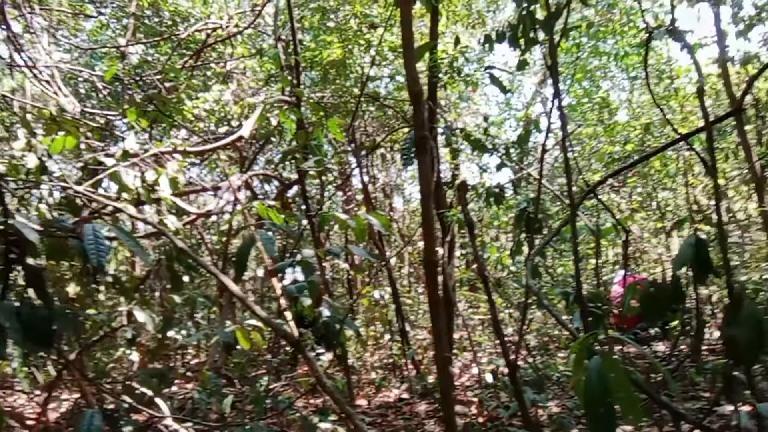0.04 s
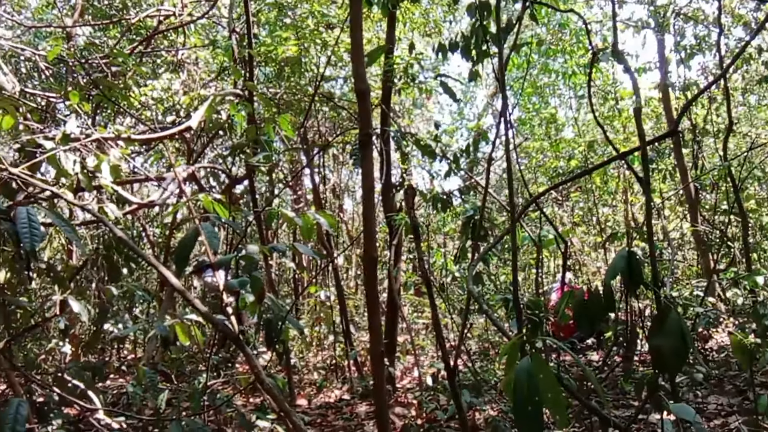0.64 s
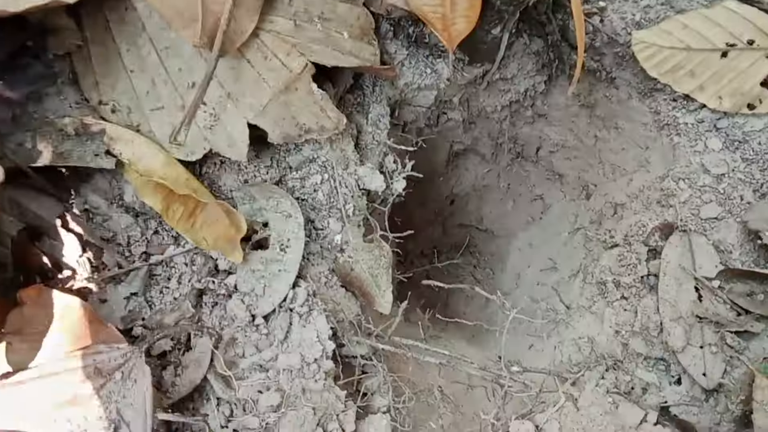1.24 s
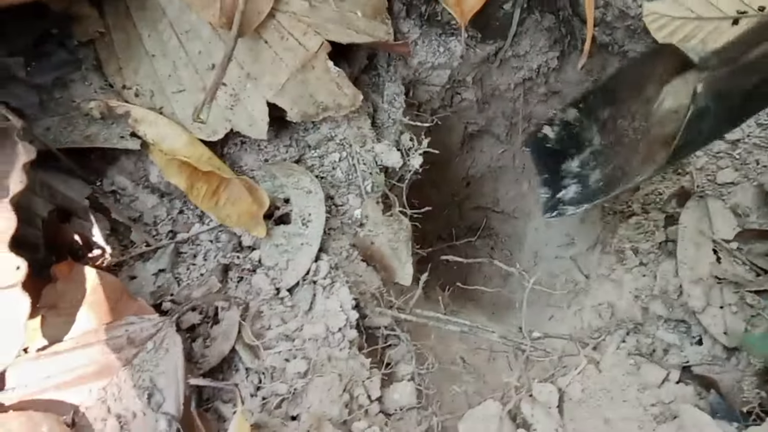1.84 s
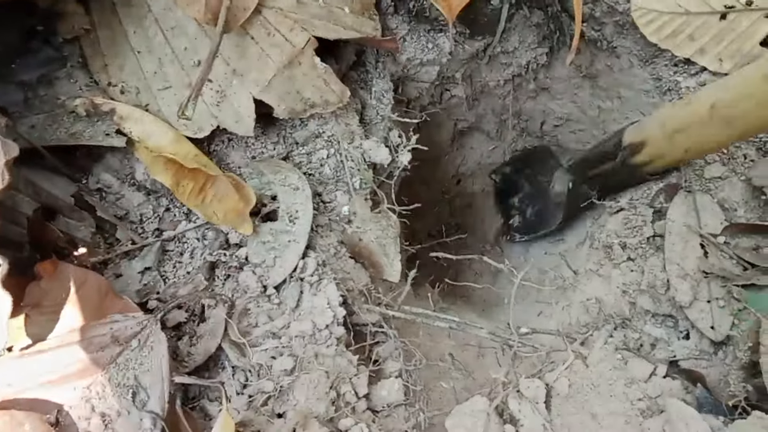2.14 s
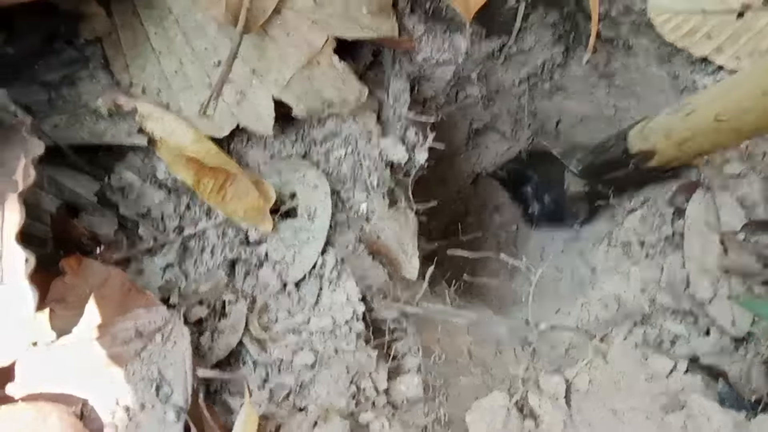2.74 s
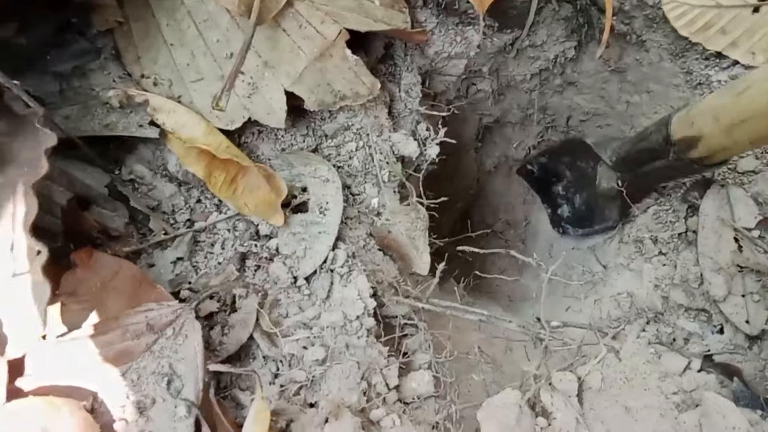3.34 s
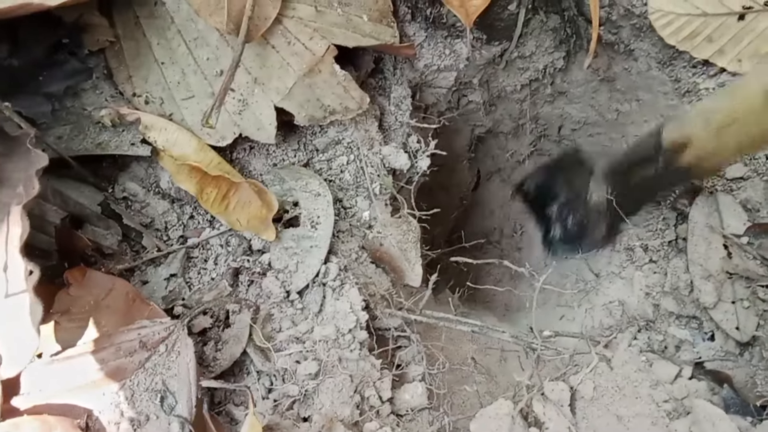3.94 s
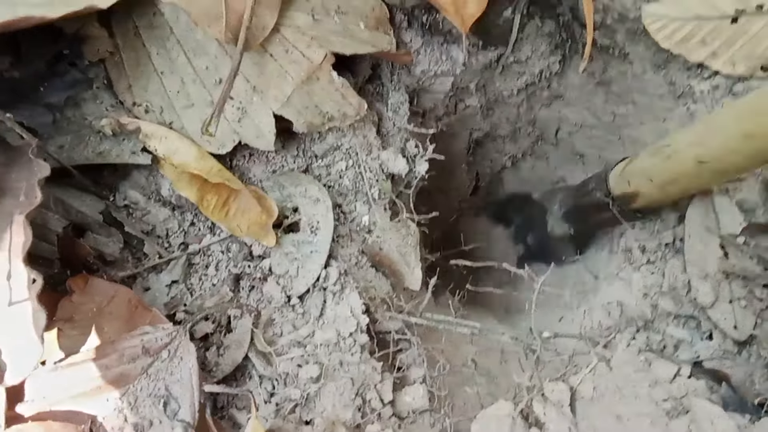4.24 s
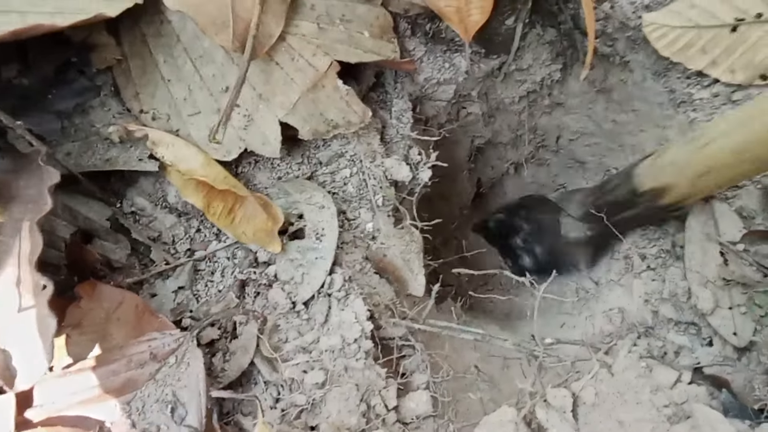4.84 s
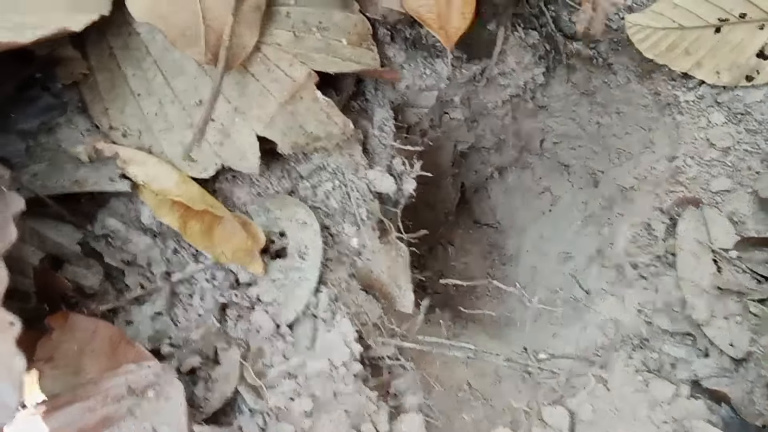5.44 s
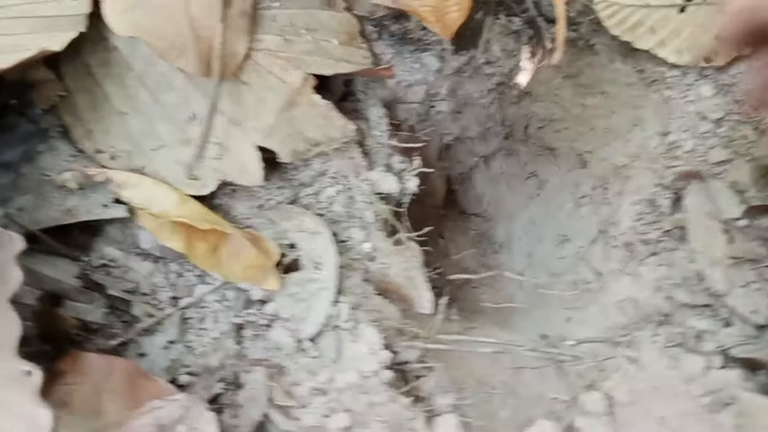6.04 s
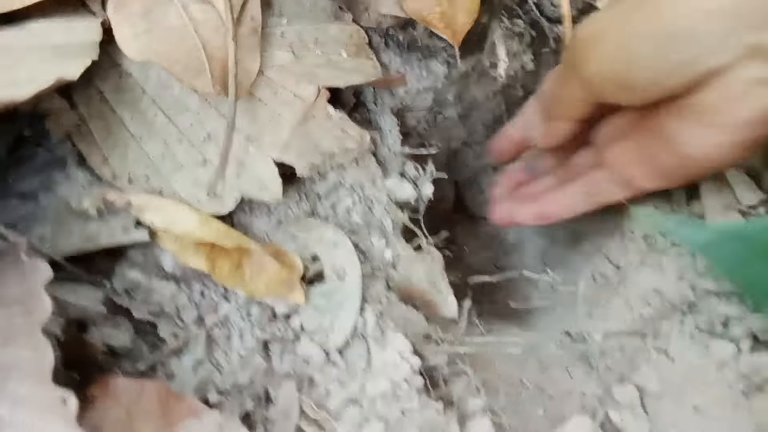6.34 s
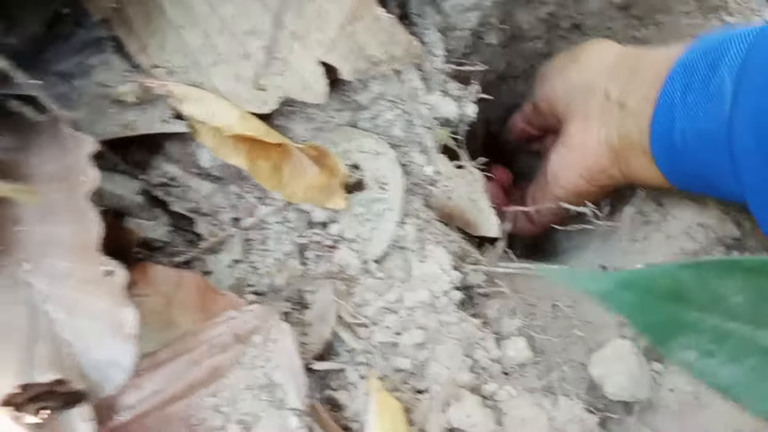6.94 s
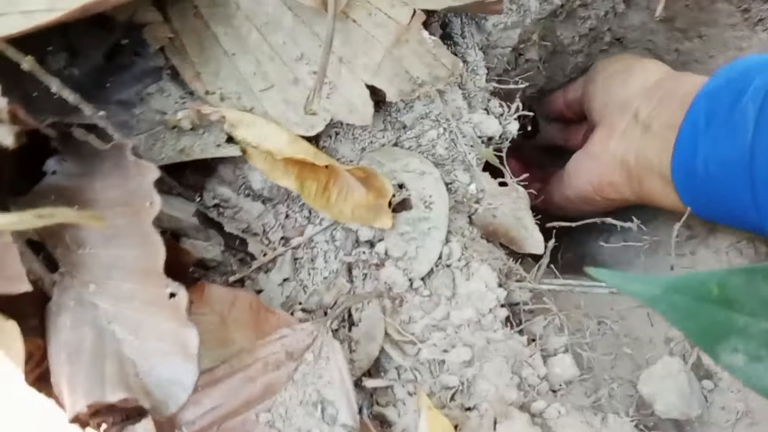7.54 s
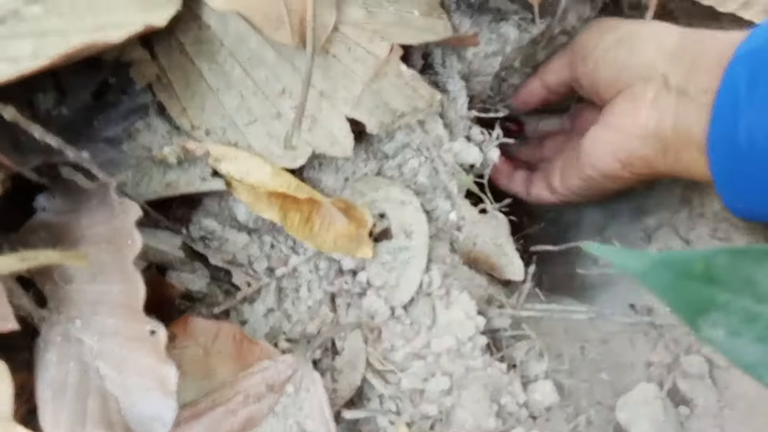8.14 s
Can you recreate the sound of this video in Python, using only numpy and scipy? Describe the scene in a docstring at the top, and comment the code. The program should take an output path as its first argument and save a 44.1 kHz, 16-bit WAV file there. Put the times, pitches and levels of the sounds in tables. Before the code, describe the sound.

Faint forest leaves, then a steel blade jabs and scrapes dry soil, followed by loud, close leaf crackling and a hand raking crumbs.

```python
"""Leaves stir some way off in a quiet forest, over a faint hum. After a short silence we are close to a hole
in dry soil, where a steel digging blade on a wooden pole jabs and scrapes: grit rings the blade, stones
click on it and the jabs thud in the ground. Then dead leaves are crushed right beside the small
microphone, crackling and snapping, and a hand picks crumbs and small roots out of the hole."""
import sys
import numpy as np
from scipy import signal
from scipy.fft import rfft, irfft
from scipy.io import wavfile
from scipy.ndimage import uniform_filter1d

SR = 44100
rng = np.random.default_rng(int(sys.argv[2]) if len(sys.argv) > 2 else 0)


def unload_wav(signal):
    """Save mono or channel-first audio to the path in sys.argv[1] as 16-bit WAV at rate SR, clipped to [-1, 1]."""
    wavfile.write(
        sys.argv[1],
        SR,
        np.round(np.clip(np.atleast_2d(signal).T, -1, 1) * 32767).astype(np.int16),
    )


N = 360738
TIME = np.arange(N) / SR
FREQ = np.linspace(1, SR / 2, 2049)
CRUSH_START_S, CRUSH_END_S = 5.432, 6.695  # the weight comes down on the leaves, and lets go
HAND_RELEASE_DB_PER_S = 476

# resonances of blade and pole, driven at the edge: pitch_hz, width_hz, level_db
EDGE_MODES = [(211, 90, -9.5), (500, 107, -9), (713, 108, 0.5), (1010, 45, 1), (1278, 83, 0.5),
              (1430, 54, -0.5), (1840, 142, -0.5), (2151, 21, 4.5), (2368, 57, 4.5), (2720, 130, 2),
              (3103, 112, 1), (3410, 200, -3), (4020, 74, 2), (4300, 18, -1), (4830, 360, 0.5),
              (5820, 103, 0.5), (6490, 164, -6), (7140, 270, -11), (8240, 120, -8), (9090, 490, -15),
              (10940, 220, -15.5), (13600, 240, -20.5)]
# spectrum of dry leaves and loose soil breaking: frequency_hz, level_db
DRY_SPECTRUM = [(60, -29.5), (150, -12.5), (400, -3.5), (750, -5), (1200, -0.5), (2300, 0), (3800, -2),
                (5500, -7), (7000, -7), (8500, -8.5), (14000, -15.5)]


def undb(db):
    return 10 ** (np.asarray(db) / 20)


def unit(x):
    return x / np.sqrt(np.mean(x ** 2) + 1e-18)


def unit_peak(x):
    return x / np.abs(x).max()


def spectrum(points):
    """Gain over FREQ from (frequency_hz, level_db) points."""
    hz, db = np.transpose(points)
    return undb(np.interp(np.log(FREQ), np.log(hz), db))


def resonance(hz, width_hz):
    """Gain over FREQ of one damped resonance."""
    return 1 / np.hypot(1, (FREQ ** 2 - hz ** 2) / (FREQ * width_hz))


def colour(x, gain):
    """Causal filter with this gain, so that rings follow their blow."""
    cepstrum = irfft(np.log(gain + 1e-7))
    cepstrum[1:len(FREQ) - 1] *= 2
    cepstrum[len(FREQ):] = 0
    return signal.fftconvolve(x, irfft(np.exp(rfft(cepstrum))))[:len(x)]


def add(out, start_s, x):
    """Mix x into out from start_s on."""
    start = int(start_s * SR)
    out[start:start + len(x)] += x[:max(len(out) - start, 0)]


def wander(rate_hz):
    """Slow random drift with a spread near 1."""
    knots = rng.standard_normal(int(N / SR * rate_hz) + 2)
    return np.interp(TIME * rate_hz, np.arange(len(knots)), knots)


def grains(n, per_s, spread_db, smear_s, dust):
    """Tiny fractures of very unequal size, each a short burst, over the even hiss of fine dust."""
    size = undb(spread_db * np.minimum(rng.exponential(size=n), 4.5))
    energy = (rng.random(n) < per_s / SR) * size ** 2
    energy = signal.lfilter([1], [1, -np.exp(-1 / (smear_s * SR))], energy)
    return np.sqrt(energy / (energy.mean() + 1e-12) + dust ** 2) * rng.standard_normal(n)


def burst(t60_s, rise_s=0.00025):
    """A noise burst that builds as a break spreads, then dies away."""
    t = TIME[:SR // 8]
    return rng.choice([-1., 1.], len(t)) * (1 - np.exp(-t / rise_s)) * undb(-60 * t / t60_s)


def registers(x, hiss_hz):
    """The middle, body and hiss of a sound, each at unit level."""
    bands = (([1000, hiss_hz], "bandpass"), (1000, "lowpass"), (hiss_hz, "highpass"))
    filters = [signal.butter(4, edge_hz, kind, fs=SR, output="sos") for edge_hz, kind in bands]
    return [unit(signal.sosfiltfilt(sos, x)) for sos in filters]


def push(row, release_db_per_s):
    """Middle, body and hiss envelopes of one push: it bites in, gains or loses force, and dies away."""
    start_s, attack_s, length_s, first_db, last_db, body_db, hiss_db = row
    t = TIME - start_s
    force_db = np.interp(t, [0, length_s], [first_db, last_db])
    force_db -= release_db_per_s * np.maximum(t - length_s, 0)
    envelope = np.clip(t / attack_s, 0, 1) * undb(np.maximum(force_db, -200))
    return np.outer(undb([0, body_db, hiss_db]), envelope)


def outdoor_air(points, level_db):
    """Open-air background whose bass wanders."""
    bed = undb(level_db) * unit(colour(rng.standard_normal(N), spectrum(points)))
    bass = colour(bed, spectrum([(250, -7.5), (600, -40)]))
    return bed + bass * (undb(8.6 * wander(6.2)) - 1)


def forest(hum_hz=712, hum_db=-75):
    """Leaves stir some way off, over still air and a faint wavering hum."""
    # still air among the trees: frequency_hz, level_db
    air_spectrum = [(18, -35), (30, -5), (86, 0), (550, -7.5), (724, 0), (800, -4.5), (2130, -9),
                    (5520, -22), (6100, -15), (6910, -27), (8240, -24.5), (12000, -27), (15600, -67),
                    (22000, -120)]
    # stirs of distant leaves: start_s, rise_s, fade_s, level_db
    stirs = [(0, 0.0035, 0.14, -55), (.14, .015, 0.037, -56), (0.481, 0.024, 0.043, -49),
             (.6, .07, 0.11, -49), (1.122, 0.02, 0.15, -57.5)]
    swells = np.zeros(N)
    for start_s, rise_s, fade_s, level_db in stirs:
        t = TIME - start_s
        swells += undb(level_db) * np.clip(t / rise_s, 0, 1) * np.exp(-np.maximum(t - rise_s, 0) / fade_s)
    leaf_tone = spectrum([(300, -18), (1200, -6.5), (2400, 3), (3400, -5), (4100, -3.5),
                          (4800, -15), (8500, -12), (12000, -19)])
    leaves = unit(colour(grains(N, per_s=1600, spread_db=4.5, smear_s=0.0015, dust=1), leaf_tone))
    hum = unit(colour(rng.standard_normal(N), resonance(hum_hz, 31) ** 2))
    return outdoor_air(air_spectrum, level_db=-60.5) + leaves * swells + undb(hum_db) * hum


def air_at_hole():
    """The low, quiet background at the digging spot."""
    # air close to the ground: frequency_hz, level_db
    air_spectrum = [(18, -59), (30, -22), (76, -3), (229, -6), (593, -15), (706, -17.5), (885, -14.5),
                    (1000, -16.5), (1200, -16.5), (2540, -20), (2950, -20), (8240, -33.5), (12000, -39),
                    (15600, -89), (22000, -120)]
    return outdoor_air(air_spectrum, level_db=-58)


def crushing(gain_db=-1, attack_s=0.0053, flatten_s=0.22):
    """Middle, body and hiss envelopes of a loose leaf pile packing down, growing fuller and duller."""
    # course of the crackle under the weight: time_s, level_db
    crackle_levels = [(5.43, -36), (5.49, -30.3), (5.61, -27.5), (5.65, -39.5), (5.7, -44), (5.77, -33.5),
                      (5.84, -32.5), (5.9, -38), (5.97, -37.5), (6.03, -30.5), (6.15, -31), (6.3, -28.5),
                      (6.68, -29)]
    t = TIME - CRUSH_START_S
    middle_db = gain_db + np.interp(TIME, *np.transpose(crackle_levels))
    middle_db -= HAND_RELEASE_DB_PER_S * np.clip(TIME - CRUSH_END_S, 0, 1)
    packed = 1 - np.exp(-np.maximum(t, 0) / flatten_s)
    body_db = middle_db + np.interp(packed, [0, 1], [-20, -3])
    hiss_db = middle_db + np.interp(packed, [0, 1], [-2, -9])
    return np.clip(t / attack_s, 0, 1) * undb([middle_db, body_db, hiss_db])


def raking(trickle_db=-47, body_db=-9, hiss_db=-15, ebb_db_per_s=6, patchy_db=3):
    """Middle, body and hiss envelopes of fingers raking the hole, over an ebbing trickle of crumbs."""
    # finger strokes: start_s, attack_s, length_s, first_db, last_db, body_relative_db, hiss_relative_db
    rakes = [(6.713, .04, 0.079, -28.5, -29.5, -7, -9.5), (6.825, 0.011, 0.066, -34.5, -36.5, -2.5, -8),
             (6.945, .01, 0.022, -38, -40, -25, -0.5), (7.004, 0.0055, 0.15, -39, -43.5, -8.5, -9.5),
             (7.223, 0.01, 0.018, -35, -33.5, -5, -4.5), (7.441, 0.0085, 0.03, -43.5, -43.5, -7.5, -5),
             (7.732, 0.0091, 0.078, -36, -45, 1.5, -8), (7.888, .01, 0.13, -51, -50, -12, -1),
             (7.985, 0.0054, 0.095, -29, -39.5, -9, -3.5)]
    t = TIME - CRUSH_END_S
    fall_db = trickle_db - ebb_db_per_s * t + patchy_db * wander(40)
    trickle = np.outer(undb([0, body_db, hiss_db]), (t > 0) * undb(fall_db))
    return np.sqrt(trickle ** 2 + sum(push(row, HAND_RELEASE_DB_PER_S) ** 2 for row in rakes))


def rustling(gain_db=1, crumb_db=-6, settled_db=-6):
    """Leaves and crumbs at the microphone: dense small fractures, and ticks from pieces of many sizes."""
    # once the leaves have settled the dense crackle recedes, and single crumbs stand out
    settling = undb(np.interp(TIME, [6.7, 7.2], [0, settled_db]))
    crackle = settling * grains(N, per_s=1000, spread_db=3.5, smear_s=0.0011, dust=0.52)
    for pitch_hz in (500, 1150, 1900, 2800, 3800, 8300):
        ticks = grains(N, per_s=90, spread_db=2, smear_s=0.0011, dust=0.044)
        crackle += undb(crumb_db) / settling * colour(ticks, resonance(pitch_hz, 1290) ** 2)
    bands = registers(colour(crackle, spectrum(DRY_SPECTRUM)), hiss_hz=5350)
    return undb(gain_db) * np.sum(bands * np.hypot(crushing(), raking()), axis=0)


def snapping(gain_db=1, relative_width=0.19, broadband=0.14, crumble_db=-26, crumble_t60_s=0.019):
    """A leaf, twig or clod breaks sharply, rings at its own pitch, then crumbles briefly."""
    # the loudest breaks: start_s, level_db, pitch_hz, t60_s, body_relative_db, hiss_relative_db
    snaps = [(1.4667, -48.5, 3320, .018, 14, -2), (1.509, -48, 4350, 0.032, 1, 1),
             (5.3876, -36, 2220, 0.082, 18, 6.5), (5.457, -24, 1570, 0.04, 2.5, 5),
             (5.5471, -12.5, 4340, 0.015, 5, 7.5), (5.5816, -14, 4120, .031, 6, 5),
             (5.5931, -19.5, 4160, 0.025, 2, 18), (5.8797, -25, 1160, .026, 12, -15),
             (5.9205, -18, 2360, 0.011, 4.5, 0), (6.144, -18.5, 2110, 0.008, 3, 2),
             (6.248, -19.5, 2320, 0.019, 16, 12), (6.2685, -18, 2160, 0.054, 10, 9.5),
             (6.2962, -11.5, 1680, 0.0041, 2, 8), (6.3244, -9, 2000, 0.0079, -9, -12),
             (6.349, -15.5, 2310, 0.021, -1, -4), (6.413, -15.5, 1270, 0.031, 6, -9),
             (6.4237, -14.5, 3480, 0.013, 18.5, 2), (6.4744, -10.5, 3400, .011, 7.5, 5),
             (6.5027, -16, 3480, 0.01, -9, -13), (6.609, -18, 3400, .013, -7, 9.5),
             (6.6412, -16.5, 1490, 0.018, 1, 3), (6.6555, -7, 1140, 0.0042, -2, -9),
             (6.6719, -18, 2230, 0.023, 3, -3), (6.6895, -12, 3750, 0.013, -3, 1),
             (6.8345, -14, 1780, 0.022, -1, -7), (6.8531, -18.5, 3800, 0.0067, -19, 4),
             (6.8863, -27.5, 1080, 0.034, 16, 4), (6.9342, -28, 2570, 0.025, -19, -3),
             (7.04, -15, 4050, 0.0069, -10, -10), (7.0758, -25.5, 4000, 0.0077, -16, -3),
             (7.0894, -30, 6800, 0.039, -19, -6), (7.121, -21, 9400, 0.013, -7.5, -7),
             (7.2333, -20, 4230, 0.057, 11, -11), (7.2416, -22.5, 1350, 0.038, -2, 4),
             (7.5205, -37, 3720, 0.018, -9, -13), (7.5398, -35.5, 3800, 0.017, 11, -16),
             (7.5916, -34.5, 2070, 0.014, -4, -13), (7.6965, -36, 2780, .012, -7, -6),
             (7.7654, -19, 3370, 0.015, 11.5, 2.5), (7.781, -24.5, 3650, .034, -1, 2),
             (7.8684, -22, 2400, 0.0078, 1, -2.5), (7.992, -10.5, 1830, 0.025, 1, -0.5),
             (8.0038, -17.5, 3260, 0.0079, 10, 5), (8.0187, -15, 4970, 0.0056, -18, -3),
             (8.0363, -24.5, 1930, 0.024, -5, 6), (8.134, -34.5, 3190, 0.011, -16, -4)]
    out = np.zeros(N)
    for start_s, level_db, pitch_hz, t60_s, body_db, hiss_db in snaps:
        piece = resonance(pitch_hz, relative_width * pitch_hz) + broadband
        tilt = spectrum([(700, body_db), (1300, 0), (4000, 0), (6000, hiss_db)])
        fracture = burst(t60_s) + undb(crumble_db) * burst(crumble_t60_s)
        snap = colour(fracture, piece * tilt * spectrum(DRY_SPECTRUM))
        strength = np.sqrt(uniform_filter1d(snap ** 2, size=88).max())  # RMS of the loudest 2 ms
        add(out, start_s, undb(level_db + gain_db) * snap / strength)
    return out


def blade_gain(modes, soil_db, detune=0.016, contact_db=2.5):
    """The blade's resonances over dead, loose soil; the point of contact favours and shifts some."""
    power = (undb(soil_db) * spectrum(DRY_SPECTRUM)) ** 2
    for pitch_hz, width_hz, level_db in modes:
        ring = resonance(pitch_hz * (1 + detune * rng.standard_normal()), 1.5 * width_hz) ** 2
        power += (undb(level_db + contact_db * rng.standard_normal()) * ring) ** 2
    return np.sqrt(power)


def stone_clicks(gain_db=2, delay_s=0.000966):
    """The blade catches a stone and the steel gives a short, bright click."""
    # stones struck: start_s, level_db
    stones = [(2.1271, -21), (2.769, -45), (3.141, -13), (3.562, -32), (4.116, -16.5), (4.6512, -19.5),
              (4.758, -15)]
    out = np.zeros(N)
    bass_cut = spectrum([(300, -12), (2000, 0)])
    for start_s, level_db in stones:
        click = colour(burst(t60_s=0.006), blade_gain(EDGE_MODES, soil_db=-20) ** 0.5 * bass_cut)
        add(out, start_s + delay_s, undb(level_db + gain_db) * unit_peak(click))
    return out


def jabbing(thud_gain_db=9.5, knock_gain_db=7, earth_hz=185, pressed_hz=140, relax_s=0.0049):
    """Jabs thump the packed earth, whose pitch sinks as it gives way, each with a hollow knock."""
    # blade or hand strikes the ground: start_s, thud_db, knock_db
    jabs = [(2.128, -49, -31.5), (3.345, -22, -28), (3.562, -46, -29.5), (3.882, -35, -42),
            (4.116, -43, -23.5), (4.178, -35.5, -33), (4.652, -61, -28.5), (6.576, -28.5, -45),
            (6.837, -42.5, -40), (7.235, -37, -22), (7.769, -55, -33), (7.868, -69, -39.5),
            (7.993, -38, -24.5)]
    out = np.zeros(N)
    t = TIME[:SR // 8]
    pitch_hz = earth_hz + pressed_hz * np.exp(-t / relax_s)
    thump = np.sin(2 * np.pi * np.cumsum(pitch_hz) / SR) * undb(-60 * t / 0.067)  # dies in 67 ms
    # the thump carries little of the deepest bass
    thump = colour(thump, spectrum([(30, -29), (70, -14), (150, -4.5)]))
    soil_tone = spectrum([(30, -20), (70, 0), (300, 0), (700, -20), (2000, -40)])
    hollow = resonance(520, 108) ** 2 + 0.44 * resonance(727, 160) ** 2 + 0.5 * resonance(964, 180) ** 2
    for start_s, thud_db, knock_db in jabs:
        crush = unit_peak(colour(burst(t60_s=0.06), soil_tone))
        add(out, start_s, undb(thud_db + thud_gain_db) * (thump + 0.56 * crush))
        knock = unit_peak(colour(burst(t60_s=0.016), hollow))
        add(out, start_s, undb(knock_db + knock_gain_db) * knock)
    return out


def scraping(firm_above_db=-35.5, slip_db=2.5, slip_hz=110):
    """Grit grinds along the edge in uneven slips; on light strokes the flat brushes the hole's wall."""
    # blade strokes: start_s, attack_s, length_s, first_db, last_db, body_relative_db, hiss_relative_db
    strokes = [(1.54, 0.021, 0.032, -39.5, -41, -9, -7.5), (2.115, 0.014, 0.11, -19, -33.5, -11, -6),
               (2.231, 0.0092, 0.045, -49, -48, -11, -5), (2.272, 0.021, 0.031, -35.5, -35.5, -10, -0.5),
               (2.309, 0.0088, 0.022, -44, -44.5, -5.5, -11), (2.351, .012, 0.037, -40, -40, -25, -3.5),
               (2.437, .008, 0.011, -48, -51, -13, -13), (2.605, 0.0087, 0.074, -40, -24, -12.5, -7),
               (2.679, 0.0096, 0.12, -27, -37.5, -12.5, -5.5), (2.801, 0.019, 0.049, -36, -35, -11.5, -6),
               (3.041, 0.01, .052, -36, -24.5, -13, -7.5), (3.097, 0.038, 0.068, -30, -31.5, -11, -7.5),
               (3.22, .01, 0.067, -57.5, -38, -25, -10.5), (3.343, .002, 0.0098, -22.5, -28, 1, -7),
               (3.559, .005, 0.053, -28.5, -28, -13, -11.5), (3.627, 0.012, 0.062, -30, -30, -12.5, -8),
               (3.825, 0.016, 0.035, -59, -55.5, -11, -7), (3.877, 0.0082, 0.013, -23, -26, -4.5, -5),
               (3.963, 0.0086, 0.014, -37.5, -42.5, -22, -12.5), (4.111, 0.0062, .074, -27, -24, -9, -5),
               (4.249, 0.028, 0.084, -58, -41, -3.5, 2), (4.343, 0.018, 0.023, -45, -38.5, -5.5, -1.5),
               (4.394, 0.0043, .012, -35, -54, -15, 0), (4.45, 0.006, 0.011, -32, -36.5, -16.5, -5.5),
               (4.518, 0.018, 0.022, -62, -61, -22, -7), (4.647, 0.0039, .008, -35, -26.5, -10, -8),
               (4.668, 0.0065, 0.083, -37, -27, -10, -2.5), (4.809, 0.033, 0.047, -38.5, -41, -16, -9),
               (4.869, 0.0077, 0.055, -52, -46.5, -1.5, 0.5), (4.946, .008, 0.016, -36, -42.5, -21, -3)]
    # resonances of blade and pole, driven on the flat: pitch_hz, width_hz, level_db
    flat_modes = [(690, 140, -13.5), (1020, 64, -12.5), (1365, 120, 0.5), (1904, 38, 2.5), (2078, 42, -1),
                  (2470, 200, -2.5), (3050, 38, 4), (3360, 114, -2.5), (4100, 107, 1.5), (4910, 210, 0.5),
                  (5740, 230, -5), (6500, 93, 5.5), (7160, 280, -2.5), (8800, 1040, -12.5),
                  (11250, 180, -25)]
    out = np.zeros(N)
    for row in strokes:
        start_s, _, length_s, first_db, last_db = row[:5]
        if max(first_db, last_db) > firm_above_db:  # packed soil stops a firm push sooner
            modes, soil_db, release_db_per_s = EDGE_MODES, -21, 764
        else:
            modes, soil_db, release_db_per_s = flat_modes, -20, 430
        start, n = int(start_s * SR), SR // 4
        # the contact travels from one part of the blade to another
        travel = np.minimum(TIME[:n] / length_s, 1)
        slips = undb(slip_db * wander(slip_hz)[:n])
        ring = np.zeros(n)
        for share in (1 - travel, travel):
            grit = grains(n, per_s=2500, spread_db=4.5, smear_s=0.00038, dust=0.72)
            ring += unit(colour(grit * slips, blade_gain(modes, soil_db))) * np.sqrt(share)
        envelopes = push(row, release_db_per_s)[:, start:start + n]
        add(out, start_s, np.sum(registers(ring, hiss_hz=5160) * envelopes, axis=0))
    return out


def scene(forest_end_s=1.255, hole_start_s=1.402):
    """Two places in mono: the forest, a short silence, then close up at the hole."""
    background = forest() * (TIME < forest_end_s) + air_at_hole() * (TIME > hole_start_s)
    digging = scraping() + jabbing() + stone_clicks()
    return (background + digging + rustling() + snapping())[None]


def record(dry, top_hz=15700):
    """A small microphone with a weak, uneven top octave."""
    # microphone response: frequency_hz, gain_db
    response = [(7600, -1.5), (8250, 1.5), (9000, -2.5), (9800, -10.5), (10900, -16.5), (11350, -6.5),
                (12100, -24), (12900, -22), (13500, -15.5), (14300, -31), (16000, -39)]
    heard = colour(dry[0], spectrum(response))[None]
    return signal.sosfilt(signal.ellip(8, 0.2, 70, top_hz, fs=SR, output="sos"), heard)


dry = scene()
out = record(dry)
unload_wav(out)
```